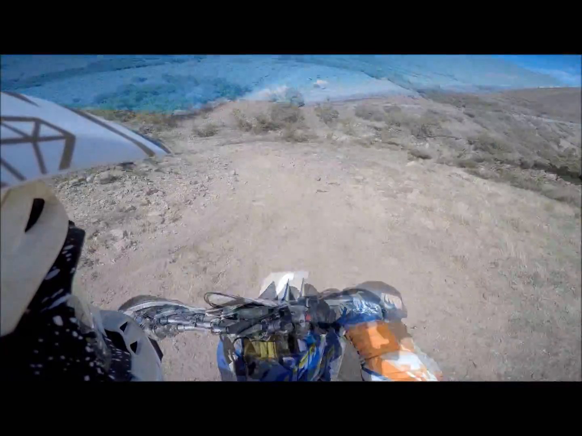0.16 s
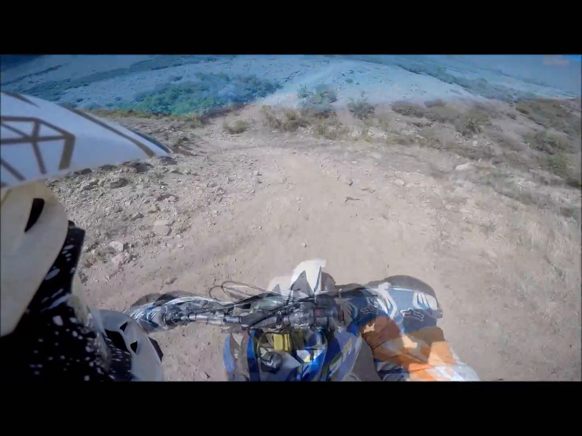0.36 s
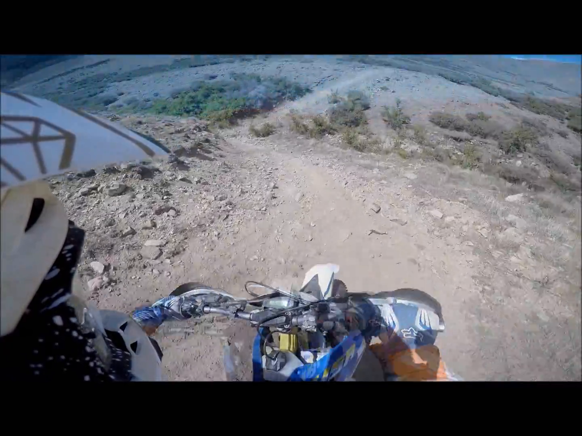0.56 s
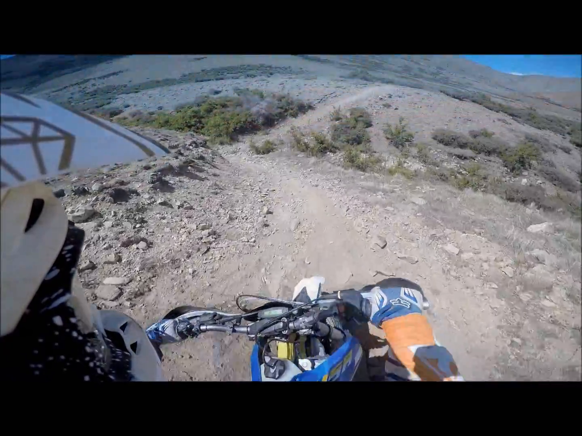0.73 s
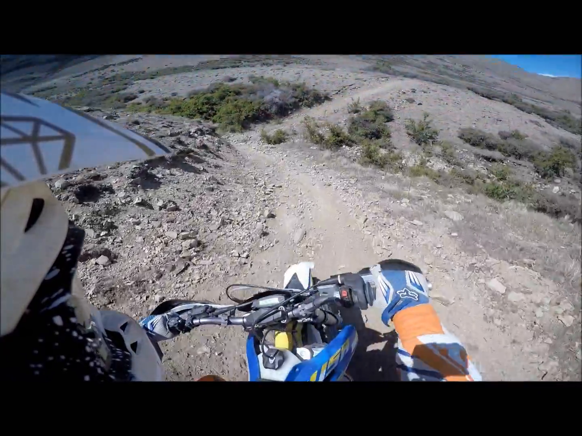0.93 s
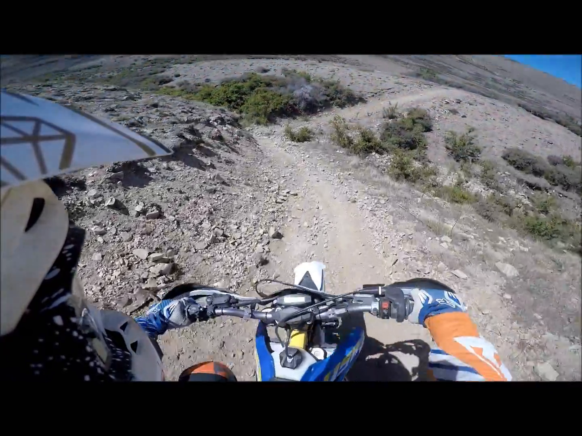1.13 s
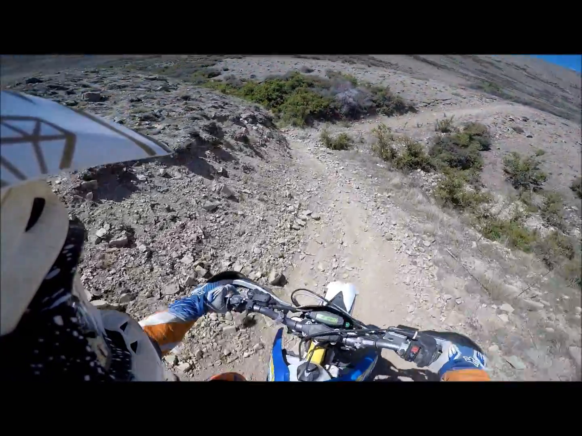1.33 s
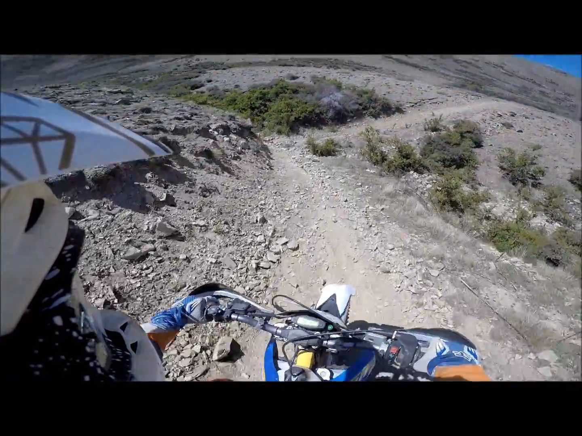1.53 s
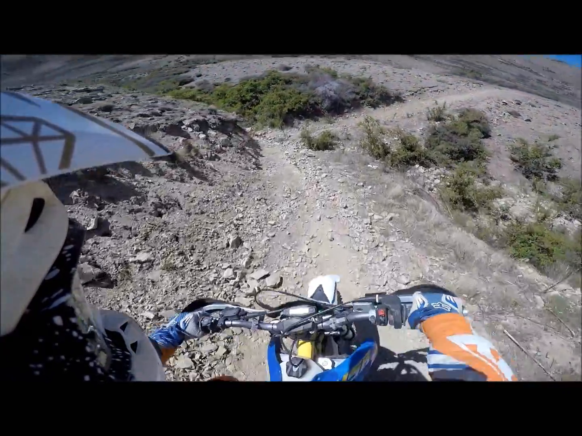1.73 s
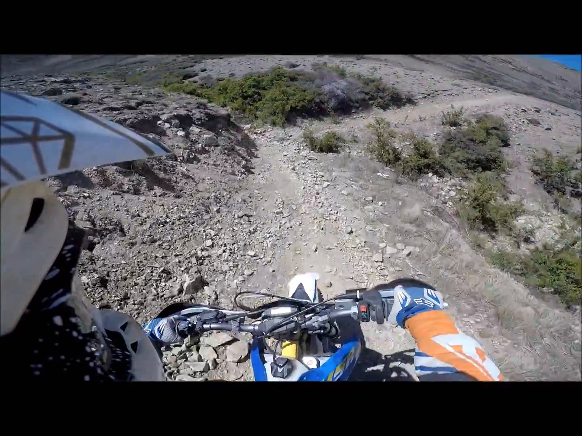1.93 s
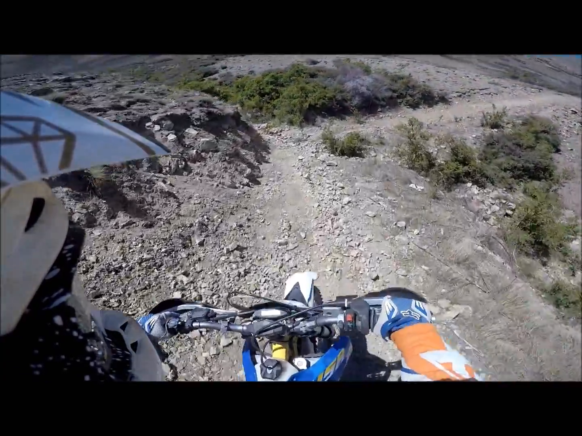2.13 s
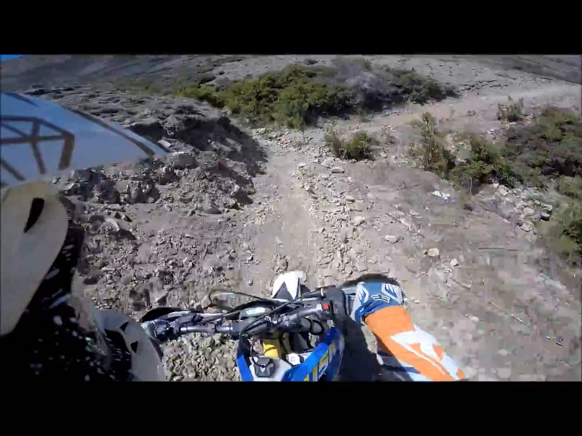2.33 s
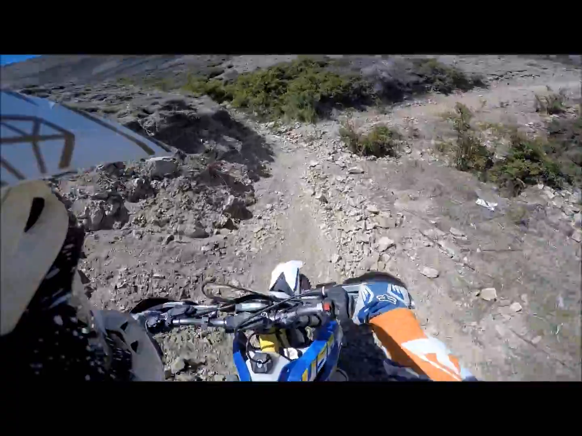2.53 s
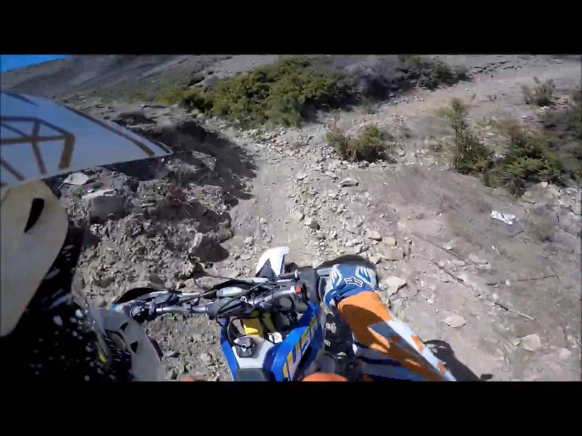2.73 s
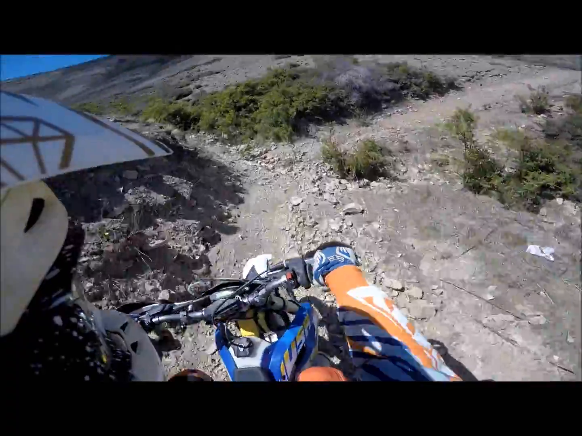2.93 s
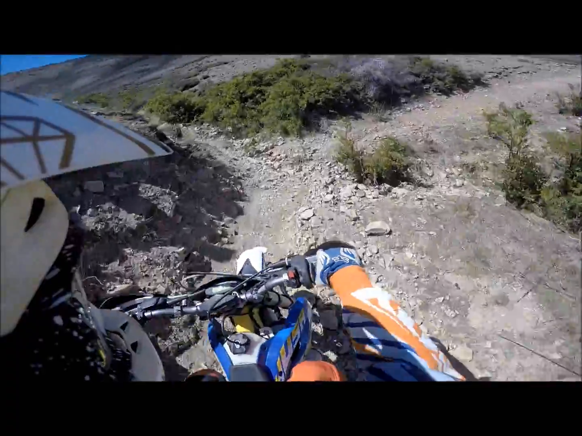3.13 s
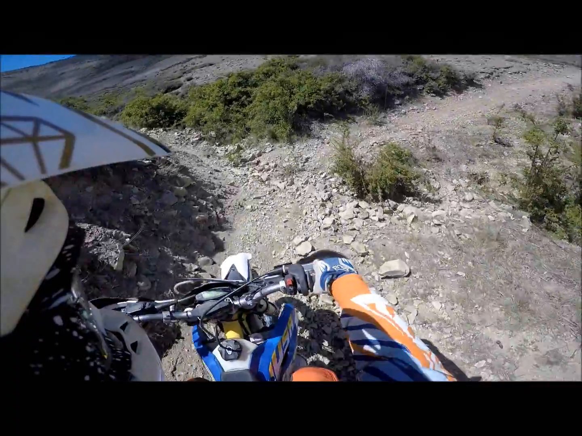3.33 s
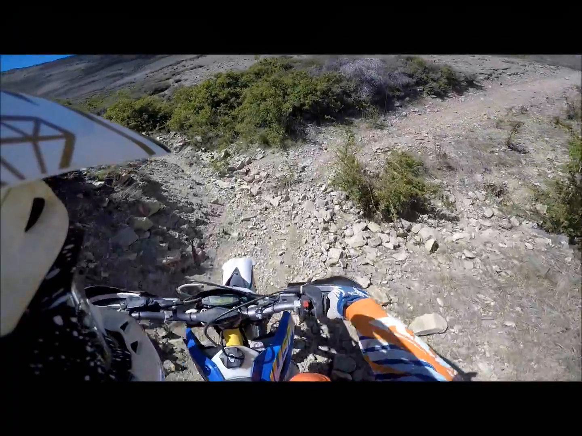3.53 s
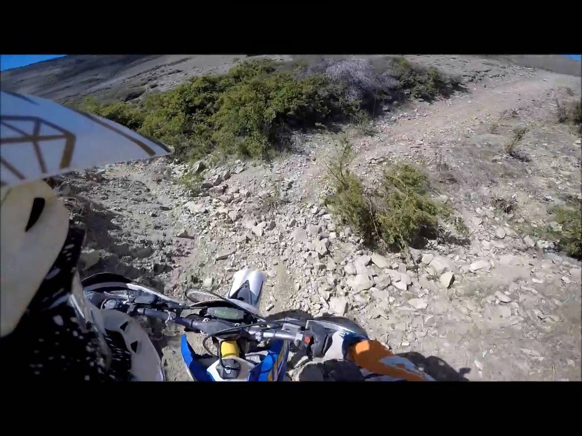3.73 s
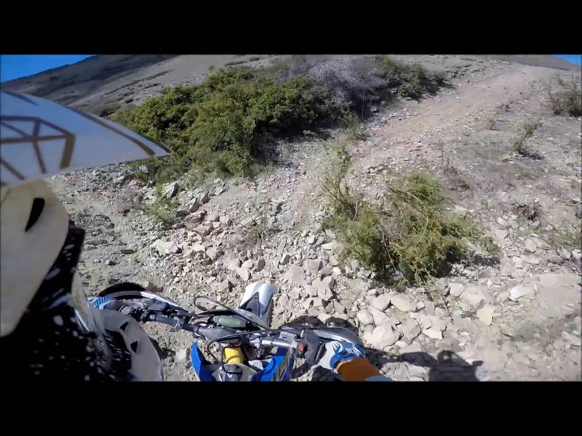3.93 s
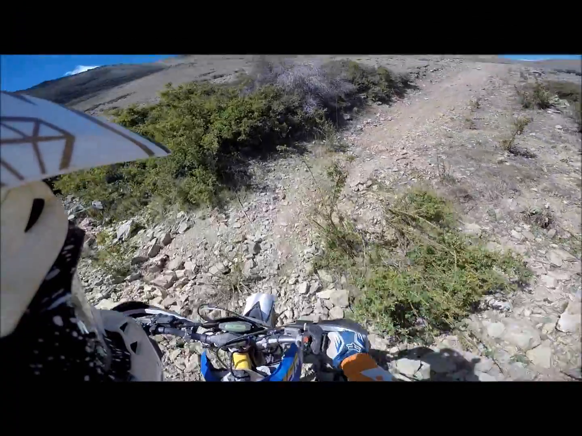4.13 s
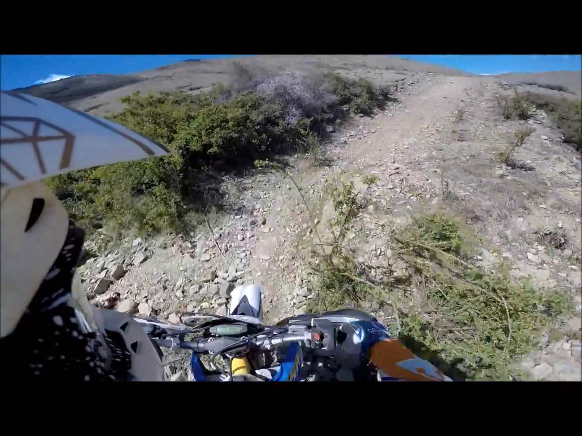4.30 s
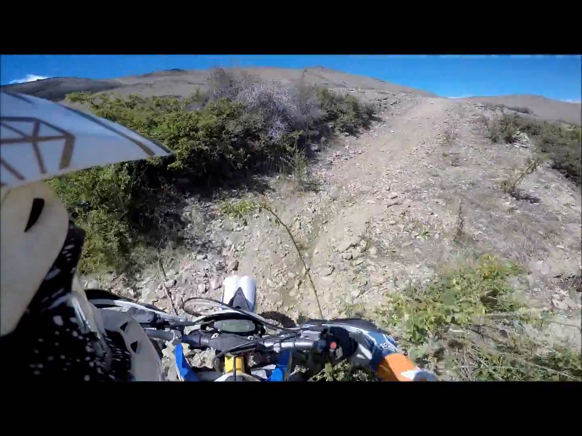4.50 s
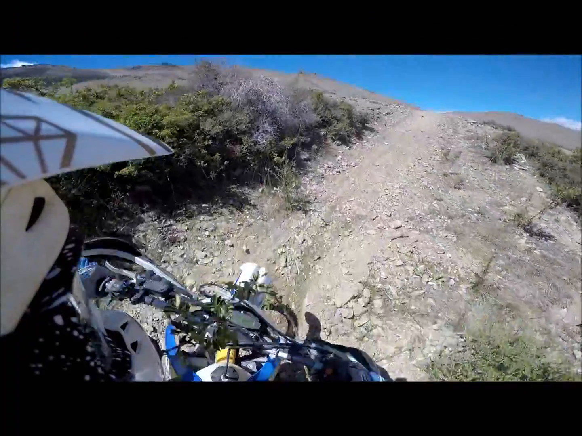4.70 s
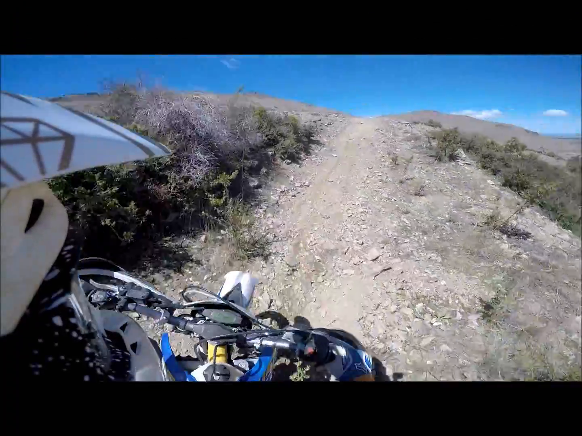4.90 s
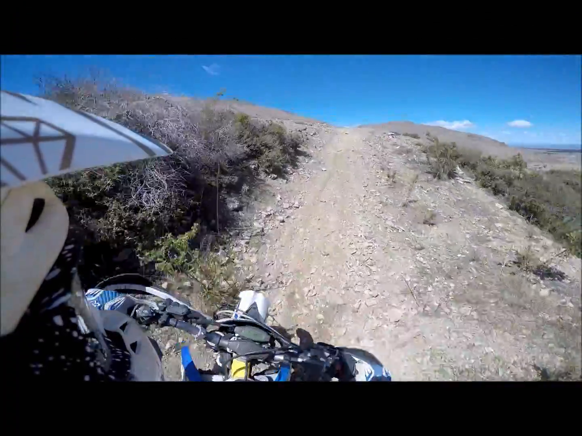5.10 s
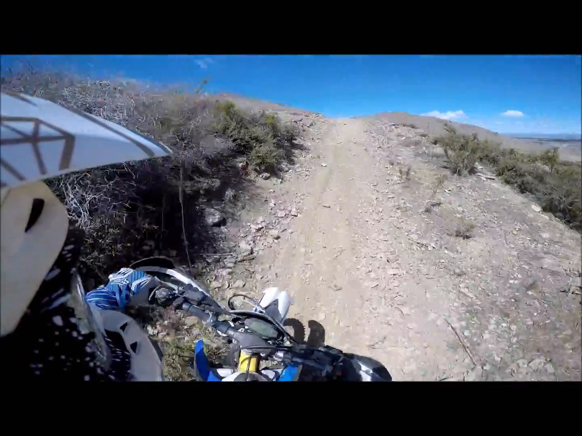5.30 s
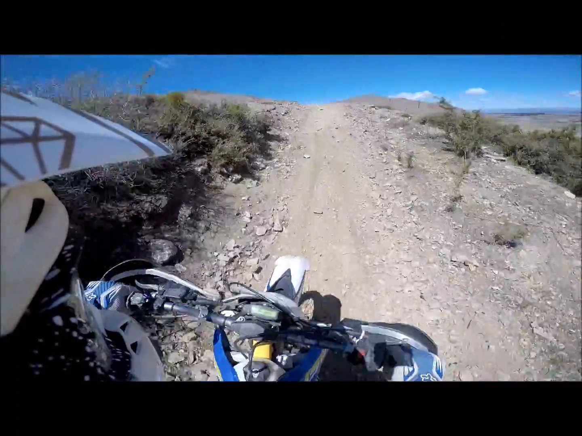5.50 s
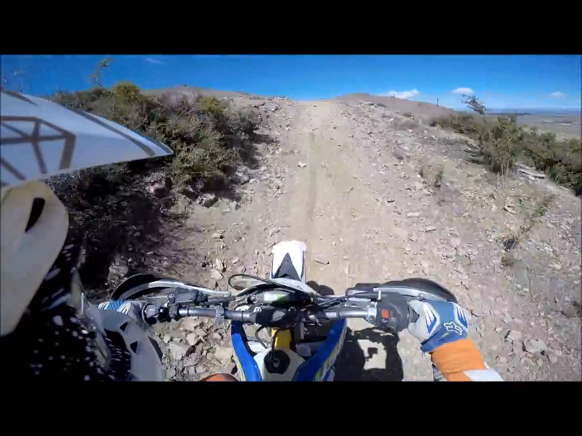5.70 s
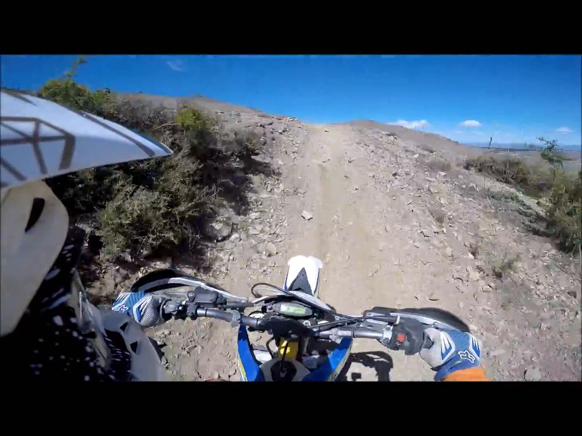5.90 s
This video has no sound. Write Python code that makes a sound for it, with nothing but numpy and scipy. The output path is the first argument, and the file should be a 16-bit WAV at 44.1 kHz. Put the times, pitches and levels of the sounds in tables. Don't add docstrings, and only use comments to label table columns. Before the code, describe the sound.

A single-cylinder two-stroke dirt bike is heard from the rider's helmet in open air, through a sealed case that makes it boomy and dull, with low wind buffeting strongest early on. From 0 to 0.2 s it holds a buzzing note near 67 Hz, then breaks into crowded, rough barks and knocks, thickest and loudest from 0.5 to 1.1 s. From about 1.2 to 4 s it coasts: hollow, uneven pops a few times a second, weak stutters between, breathy hisses of exhaust gas, light metal clatter, gritty ticks and stone cracks. At 4.05 s a hard blip rises and drops away by 4.35 s. Around 4.65 s stones clank with a brief metallic ping as the engine lugs and picks up, falters near 4.85 to 4.95 s, then pulls again. From 5.07 s to the end, a steady, hard, raspy exhaust drone holds around 60 to 67 Hz, with a buzzing intake.

```python
import sys
import numpy as np
from scipy import signal
from scipy.fft import rfft, irfft, next_fast_len
from scipy.io import wavfile
from scipy.ndimage import map_coordinates

SR = 44100
rng = np.random.default_rng(int(sys.argv[2]) if len(sys.argv) > 2 else 0)


def gain_from_db(level_db):
    decades = np.asarray(level_db, float) / 20
    return 10 ** decades


def pcm_store(signal):
    levels = np.round(np.clip(np.atleast_2d(signal), -1, 1) * 32767)
    wavfile.write(sys.argv[1], SR, levels.astype(np.int16).T)


N = 262395


def unit(x):
    return x / np.sqrt(np.mean(x ** 2) + 1e-20)


def along(points, hz):
    f, v = np.transpose(points)
    return np.interp(np.log(hz + 1), np.log(f + 1), v)


def curves(rows):
    s, *cols = np.transpose(rows)
    return [np.interp(np.arange(N) / SR, s, c) for c in cols]


def wobble(rate, size=N):
    knots = rng.standard_normal(int(size * rate / SR) + 4)
    return map_coordinates(knots, [np.arange(size) * rate / SR])


def filtered(x, response):
    m = next_fast_len(N + SR // 2)
    return irfft(rfft(x, m) * response(np.fft.rfftfreq(m, 1 / SR)), m)[:N]


def noise(spectrum):
    return unit(filtered(rng.standard_normal(N), lambda hz: gain_from_db(along(spectrum, hz))))


def modes(table):
    def response(f):
        total = 0
        for k, (centre, width, db) in enumerate(table):
            damping = 1j * f * width
            total = total + (-1) ** k * gain_from_db(db) * damping / (centre * centre - f * f + damping)
        return total
    return response


def placed(starts, rows):
    at = np.round(np.asarray(starts) * SR).astype(int)[:, None] + np.arange(rows.shape[1])
    return np.bincount(at.ravel(), rows.ravel(), N + SR)[:N]


def bursts(s, db, life, hold):
    t, life = np.arange(SR // 8) / SR, np.clip(life, .004, .2)[:, None]
    decay = gain_from_db(db[:, None] - 60 * (t / life) ** hold)
    return placed(s - .001, decay * (1 - np.exp(-t / (0.023 * life))))


def turn_beat(strokes):
    t = np.arange(SR // 20) / SR
    return signal.fftconvolve(strokes, t / 0.0069 * np.exp(1 - t / 0.0046))[:N]


# time in seconds, wind level in
# dB, clatter level in dB.
RIDE = [(0.08, -19, -38), (0.36, -19.5, -39), (0.75, -18, -35), (0.91, -15.5, -32.5), (1.0, -21.5, -40.5),
        (1.36, -31, -45.5), (1.55, -21.5, -40.5), (2.09, -21.5, -37.5), (2.67, -27, -39.5),
        (3.3, -23, -37.5), (3.68, -27.5, -40.5), (4.03, -23, -39), (4.2, -27.5, -44), (4.48, -30, -46.5),
        (4.66, -35, -37.5), (4.83, -33, -49), (5.03, -35, -43), (5.7, -36, -39.5)]
# frequency in Hz, density in dB per Hz.
BUFFET = [(11, -34), (18, 5), (75, 3), (113, -8), (146, -2.5), (200, -24.5), (260, -36), (440, -120)]


def wind():
    buffet_db = curves(RIDE)[0]
    return gain_from_db(buffet_db + 2.0 + 0.35 * wobble(18.0) + 0.28 * wobble(18)) * noise(BUFFET)


# frequency in Hz, level in dB.
WHINE = [(12618, -79)]


def whine():
    (hz, db), = WHINE
    phase = 2 * np.pi * np.cumsum(hz + 7 * wobble(20)) / SR
    return gain_from_db(db + 1.5 + 2.5 * wobble(10)) * np.sin(phase)


# frequency in Hz, density in dB per Hz.
JET = [(2500, -120), (3500, -3.5), (5300, -1), (7500, -9), (11000, -14), (15200, -15), (15800, -28.5)]


def sand():
    loose_ground_s, grain_t60_s = 4, 0.0091
    luck = rng.random((56, 2))
    db = -39 - 4 * np.log(luck[:, 1] + .12)
    starts = 0.014 + loose_ground_s * luck[:, 0]
    return bursts(starts, db, np.full(len(db), grain_t60_s), 0.89) * noise(JET)


# start in seconds, level in dB, t60 in seconds.
STONES = [(0.322, -31, 0.061), (0.338, -22, 0.07), (0.358, -27, 0.07), (.607, -28, 0.076),
          (1.04, -29.5, 0.083), (1.088, -27.5, 0.068), (1.286, -29.5, 0.054), (1.323, -24, 0.063),
          (1.466, -25.5, 0.054), (1.653, -25.5, 0.047), (1.947, -30.5, 0.053), (2.135, -21, 0.084),
          (2.155, -33, 0.055), (2.6, -25.5, 0.076), (2.717, -28.5, 0.046), (3.078, -26.5, 0.057),
          (3.251, -34, .06), (4.11, -32, .04), (4.644, -24, 0.02), (4.649, -19, 0.03), (4.697, -26, 0.034)]
# frequency in Hz, density in dB per Hz.
GRIT = [(700, -120), (1100, 0), (2500, 4.5), (4500, -2.5), (6500, -6), (8500, -26)]


def stones():
    return bursts(*np.transpose(STONES), 0.88) * noise(GRIT)


# start in seconds, frequency in Hz, level in dB, t60 in seconds.
PINGS = [
    (0.301, 2490, -23.5, 0.053),
    (3.386, 5210, -19, 0.022),
    (4.651, 1500, -21, 0.03),
    (4.651, 2300, -22, 0.025),
    (4.645, 5545, -14.5, 0.011),
]


def pings():
    s, hz, db, t60 = np.transpose(PINGS)[:, :, None]
    t = np.arange(SR // 10) / SR
    envelope = gain_from_db(db - 60 * t / t60) * (1 - np.exp(-t / 0.00077))
    return placed(s[:, 0], envelope * np.sin(2 * np.pi * hz * t))


# frequency in Hz, density in dB per Hz.
METAL = [(530, 2), (900, -0.5), (1160, -6), (1670, -5), (2120, -9), (2310, -5.5), (2700, -6.5), (3190, -10),
         (5070, -12.5), (6290, -15), (8170, -29), (13000, -35), (15300, -41.5), (15800, -51)]
# frequency in Hz, width in Hz, level in dB.
PANELS = [
    (2810, 150, 0),
    (5050, 350, -5),
]
# frequency in Hz, density in dB per Hz.
RASP = [(1100, -55.5), (1400, -6.5), (1750, -3), (2300, -14), (4500, -4.5), (8000, -12), (15200, -16.5),
        (15800, -27.5)]


def clatter(beat, throttle, blip):
    clatter_db = curves(RIDE)[1]
    rattle = gain_from_db(1.01 * wobble(22.95) + 1.3 * wobble(90)) * (1.57 + 0.32 * beat) * noise(METAL)
    ringing = unit(filtered(rng.standard_normal(N), lambda f: modes(PANELS)(f) ** 2))
    fins = gain_from_db(-6 - 8 * throttle) * (.45 + 1.0 * beat) * ringing
    opening = .55 * throttle + 1.4 * blip
    rasp = gain_from_db(-2 + 1.8 * wobble(6.5)) * opening * (0.45 + .7 * beat) * noise(RASP)
    return gain_from_db(clatter_db - 1.5) * (rattle + fins + rasp)


# time in seconds, effort in dB.
EFFORT = [(0.2, -25.5), (0.4, -20.5), (0.66, -18), (0.78, -15.5), (0.92, -18), (1.0, -20.5), (1.11, -14.5),
          (1.15, -27), (1.45, -27.5), (2.25, -17.5), (2.67, -23), (3.5, -24.5), (4.03, -25.5),
          (4.12, -17.5), (4.24, -15.5), (4.33, -35.5), (4.6, -16), (4.85, -23)]
# frequency in Hz, density in dB per Hz.
ROAR = [(71, -17), (120, -23), (182, 1), (232, -4), (355, -4.5), (435, -4.5), (529, -10), (591, -9),
        (781, -22), (1100, -45), (1430, -59), (2420, -120)]


def roar(beat, throttle):
    roar_db = (1 - throttle) * curves(EFFORT)[0] - 36 * throttle
    unsteady_db = np.clip(2.2 * wobble(30), -4, 2)
    return gain_from_db(roar_db + 2.5 + unsteady_db) * (0.42 + 0.55 * beat) * noise(ROAR)


# start in seconds, peak in dB.
PUFFS = [(0.112, -32.5), (0.2309, -52), (0.3227, -30), (0.354, -32), (0.524, -29.5), (0.618, -30.5),
         (0.6496, -31), (0.6748, -32), (0.7, -31.5), (0.744, -28.5), (0.9557, -25), (0.995, -44),
         (1.047, -37), (1.0927, -30), (1.115, -33), (1.18, -38.5), (1.648, -30), (2.066, -34.5),
         (2.44, -39), (4.146, -39), (4.1699, -48), (4.417, -38.5), (4.506, -32), (4.562, -31.5),
         (4.609, -35), (4.8274, -37), (4.896, -38), (4.9483, -38)]
# start in seconds, silencer ring in dB, chamber ring in dB, puff in dB.
POPS = [(1.451, -14.5, -29, -48), (1.569, -8.5, -11, -28.5), (1.85, -11, -34, -50), (1.935, -12, -33, -40),
        (2.03, -12.5, -38, -47), (2.214, -9, -19, -34.5), (2.367, -6.5, -33, -32),
        (2.531, -29, -9.5, -34.5), (2.636, -6, -12.5, -30), (2.84, -7, -15, -31.5), (2.984, -6.5, -13, -28),
        (3.17, -4.5, -15, -25.5), (3.391, -5, -10, -25.5), (3.591, -9, -26, -37.5),
        (3.682, -11, -14, -34.5), (3.857, -6, -10.5, -26)]
# frequency in Hz, density in dB per Hz.
DULL = [(900, -120), (1300, 4.5), (2500, 12), (4000, -0.5), (5000, -120)]


def puffs():
    pops = np.transpose(POPS)
    pop_puffs = [pops[0] - 0.003, pops[3]]
    s, db = np.hstack([np.transpose(PUFFS), pop_puffs])
    t60_s = 0.085 + 0.0028 * (db + 32)
    shape = bursts(s, db - 3.5, t60_s, 1.066)
    return shape * gain_from_db(2.7 * wobble(250)) * (noise(JET) + gain_from_db(-5.5) * noise(DULL))


# time in seconds, frequency in Hz, level in dB.
SURGE = [
    (4.109, 48.8, -12),
    (4.188, 80.6, -22.5),
    (4.244, 101, -29),
    (4.311, 117, -33),
]


def surge():
    hz, db = curves(SURGE)
    time = np.arange(N) / SR
    fade = np.clip(np.minimum(time - SURGE[0][0], SURGE[-1][0] - time) / 0.05, 0, 1)
    return fade * gain_from_db(db + 5.5) * np.sin(2 * np.pi * np.cumsum(hz) / SR), fade


# time in seconds, level in dB.
VALVE = [(0.2, 0), (4.7, -5), (5.0, -4), (5.45, -2), (5.56, 4.5), (5.67, 3.5), (5.73, -1), (5.85, 3)]
# frequency in Hz, width in Hz, level in dB.
REED = [(1280, 200, -2), (1640, 260, -0.5), (1900, 240, -1.5), (2380, 380, -1), (2850, 300, -2.5)]


def reed_valve(steady):
    valve_db = curves(VALVE)[0]
    t = np.arange(SR // 30) / SR
    flutter = rng.standard_normal(len(t)) * gain_from_db(-60 * t / .016)
    flutter = flutter / np.linalg.norm(flutter)
    snaps = signal.fftconvolve(gain_from_db(valve_db + .9 * wobble(60)) * steady, flutter)[:N]
    return filtered(snaps, lambda f: modes(REED)(f) ** 2)


# start in seconds, peak in dB, pitch in Hz.
KNOCKS = [(0.236, -19, 522), (0.356, -10.5, 612), (0.482, -26, 550), (0.514, -25, 516), (0.534, -11, 581),
          (0.578, -11, 590), (0.65, -9, 516), (0.75, -11.5, 510), (0.858, -20, 526), (0.897, -19, 525),
          (0.964, -19, 566), (1.049, -17, 635), (1.161, -18.5, 522), (1.183, -15, 510), (1.571, -13, 514),
          (1.685, -20, 580), (1.812, -22, 525), (1.859, -19, 522), (1.894, -20, 522), (1.992, -21, 566),
          (2.119, -10.5, 610), (2.186, -11.5, 546), (2.278, -19, 596), (2.323, -16.5, 554),
          (2.369, -16, 564), (2.414, -21, 596), (2.486, -22, 523), (2.535, -19, 565), (2.59, -21, 568),
          (2.634, -12, 549), (2.791, -29, 554), (3.154, -20, 570), (3.17, -14, 570), (3.39, -13, 525),
          (3.599, -13, 522), (3.689, -17, 552), (3.732, -18, 581), (3.858, -15, 530), (4.022, -22, 546),
          (4.066, -5.5, 504), (4.109, -6, 533), (4.163, -12, 522), (4.189, -21, 510), (4.39, -22, 540),
          (4.456, -31, 596), (4.474, -27, 517), (4.54, -18, 543), (4.566, -16, 589), (4.612, -13, 565),
          (4.658, -6, 522), (4.796, -25, 638), (4.831, -15, 522), (4.875, -31, 523), (4.994, -14, 670)]


def knocks():
    t60_s, rise_s = 0.045, 0.0014
    s, db, hz = np.transpose(KNOCKS)[:, :, None]
    t, luck = np.arange(SR // 16) / SR, rng.random((len(KNOCKS), 2))
    ring = np.sin(2 * np.pi * (hz * t + luck[:, :1]))
    ring += 0.28 * np.sin(2 * np.pi * (1.22 * hz * t + luck[:, 1:]))
    envelope = gain_from_db(db + 1 - 60 * t / t60_s) * (1 - np.exp(-t / rise_s))
    return placed(s[:, 0] - 0.001, envelope * ring)


# start in seconds,
# chamber ring in dB, silencer ring in dB, thump in dB.
KICKS = [(0.24, -11, -16, -9), (0.415, -10, -25, -15), (0.605, -3.5, -11, -11), (0.794, -16, -15, -1.5),
         (0.818, -16, -13.5, -4), (0.85, -24, -13, -7), (0.872, -12, -26, -7), (0.93, -6, -31, -4),
         (4.091, -7.5, -15, -16), (4.13, -18, -28, -22), (4.231, -3, -13.5, -15), (4.275, -13.5, -19, -18),
         (4.361, -20, -22, -37), (4.389, -14.5, -20, -24), (4.414, -20, -22, -15), (4.451, -16, -32, -20),
         (4.502, -5, -22, -18), (4.585, -6, -12, -11), (4.632, -1.5, -22, -25), (4.921, -4.5, -14, -20),
         (0.299, -6, -29, -18), (0.332, -6.5, -22, -20), (0.35, -13.5, -12.5, -21), (0.367, -7.5, -8, -7),
         (0.472, -2.5, -31, -17), (0.532, -0.5, -6.5, -8.5), (0.577, 4, -29, -7), (0.645, -5.5, -5.5, -0.5),
         (0.667, 0.5, -15, -13), (0.697, 1.5, -4, -9), (0.744, -7, -6.5, -3.5), (0.959, 3, -5.5, 1.5),
         (0.99, 5, -11, -12), (1.021, 2, -26, -14), (1.049, -1, -12.5, -17), (1.07, -1, -10, -11),
         (1.094, -0.5, -9, -15.5), (1.114, -6, -20, -20), (4.061, -4, -10, -14), (4.105, 5, -3, -33),
         (4.157, -10, -7.5, -21.5), (4.194, -1.5, -2.5, -9), (4.214, -0.5, -1, -23), (4.256, -28, -18, -19),
         (4.475, -7.5, -12, -36), (4.537, -4, -12, -11), (4.559, -3.5, -20, -34), (4.611, 4.5, -5, -27),
         (4.828, -6, -22, -17), (4.895, -5, -23, -12), (4.966, -5, -13, -22),
         (0.488, -12, -23, -11), (0.519, -18, -9, -20), (0.557, -9, -21, -22), (0.621, -12, -9, -3),
          (0.684, -11, -11.5, -6), (0.978, -4.5, -13.5, -20), (1.007, -9, -11, -20), (1.036, -10, -7, -20),
          (4.145, -15, -8.5, -12), (4.175, -18.5, -18.5, -17), (4.185, -6, -8.5, -22),
          (4.204, -10, -8, -20)]
# start in seconds, silencer ring in dB, chamber ring in dB.
STUTTERS = [(1.16, -18, -35), (1.345, -17.5, -28), (1.417, -25, -38), (1.495, -21.5, -25.5),
            (1.533, -22, -26), (1.65, -15.5, -21), (1.685, -21, -22.5), (1.811, -17.5, -33),
            (1.9, -21, -31), (1.993, -12, -24), (2.082, -17.5, -25), (2.148, -18, -21), (2.185, -17, -23),
            (2.274, -21, -26), (2.31, -16, -14), (2.412, -17, -24), (2.469, -30, -19.5), (2.59, -19, -16),
            (2.688, -19, -20), (2.752, -32, -17.5), (2.793, -16.5, -17), (2.907, -26, -23),
            (2.944, -18, -18.5), (3.035, -15, -20), (3.079, -20, -18), (3.124, -26, -17),
            (3.219, -17, -21.5), (3.256, -19, -34), (3.315, -17, -19), (3.35, -19, -19.5),
            (3.434, -17, -20), (3.486, -26, -42), (3.563, -20, -29), (3.64, -15.5, -19), (3.73, -15.5, -18),
            (3.772, -23, -20), (3.829, -18, -18), (3.899, -21, -19), (4.001, -25, -44)]
# time in seconds, speed in turns per second.
SPEED = [(0, 24), (.6, 30), (1.0, 40), (1.2, 25), (1.5, 21.5), (3.9, 21.5), (4.1, 42), (4.3, 30), (5, 36)]
# level at idle effort in dB, dB gained per dB of effort, scatter in dB.
WEAK = [
    (-24, 1, -3),
    (-23, 0.6, 8.5),
    (-16, 0, -6.5),
]


def fired(throttle):
    s, silencer, chamber, _ = np.transpose(POPS)
    pops = np.transpose([s, chamber, silencer, silencer])
    s, silencer, chamber = np.transpose(STUTTERS)
    ignition = s - 0.00408
    stutters = np.transpose([ignition, chamber, silencer, chamber]) + (0, 4.5, 0.5, 4)
    strong = np.vstack([KICKS, pops, stutters])
    edges = np.sort(np.append(strong[:, 0], .2))
    gaps = np.diff(edges)
    speed = np.transpose(SPEED)
    counts = np.round(gaps * np.interp(edges[:-1] + gaps / 2, *speed)).astype(int)
    s = np.hstack([np.linspace(a, b, n + 1)[1:-1] for a, b, n in zip(edges, edges[1:], counts)])
    luck = rng.standard_normal((len(s), 4))
    s = s + 0.0876 * luck[:, 3] / np.interp(s, *speed)
    base, grows, scatter = np.transpose(WEAK)
    effort = np.interp(s, *np.transpose(EFFORT))[:, None] + 24
    weak = base + grows * effort + scatter * np.clip(luck[:, :3], -2, .9)
    weak = weak - 60 * throttle[(s * SR).astype(int), None]
    return np.vstack([strong, np.column_stack([s, weak])])


def echoed(hz, share):
    round_trip_s = 0.0111
    return 1 / (1 - np.clip(share, 0, .8) * np.exp(-2j * np.pi * hz * round_trip_s))


# frequency in Hz, swell time in seconds, pitch scatter as a share,
# sharpness (no unit), phase at the crest in rad.
RINGS = [
    (248, 0.0065, 0.04, 1.9, 1.54),
    (445, 0.0075, 0.035, 1.3, 0.07),
    (98, 0.0075, 0.14, 2.4, 2.65),
]


def firings(rows):
    s, *levels = np.transpose(rows)
    t, out = np.arange(SR // 16) / SR, np.zeros(N)
    for (hz, swell, scatter, sharp, start), db in zip(RINGS, levels):
        luck = rng.standard_normal((len(s), 2))
        shape = (t / swell * np.exp(1 - t / swell)) ** sharp
        pitch = hz * (1 + scatter * luck[:, :1])
        phase = 2 * np.pi * pitch * (t - swell) + start + 0.5 * luck[:, 1:]
        out += placed(s + 0.002, gain_from_db(db - 3.5)[:, None] * shape * np.cos(phase))
    crack_hz = 630 * (1 + 0.18 * rng.standard_normal((len(s), 1)))
    crack = gain_from_db(-60 * t / 0.029) * np.sin(2 * np.pi * crack_hz * t)
    crack_db = np.maximum(levels[0], levels[1]) - 11.5
    crack = placed(s + 0.00456, gain_from_db(crack_db)[:, None] * crack)
    crack = filtered(crack, lambda f: 1 / (1 + 1j * f / 800) ** 4)
    return filtered(out + crack, lambda f: echoed(f, 0.03))


RETURNS = [
    [(-.68, .475), (-.835, .884), (.92, .077)],
    [(-.73, .79), (-.45, .466), (1.01, .413)],
]
RETURN_RAD = [3.77, 3.89]


def returns(k, song):
    sums = []
    for rows, rad in zip(RETURNS, RETURN_RAD):
        reflected = sum(share * np.exp(-2j * np.pi * k * delay) for share, delay in rows)
        sums.append(np.exp(1j * rad) * (1 + reflected))
    off, on = sums
    return np.angle(off) + song * np.angle(on / off)


# time in seconds, share on song from 0 to 1.
ON_SONG = [(.3, 1), (4.5, 0), (5.2, 0), (5.31, 1)]


def pull(rows, orders, home_hz, rough_db, turns):
    time = np.arange(N) / SR
    running = np.clip(np.minimum(time - rows[0][0], rows[-1][0] - time) / 0.077 + .5, 0, 1)
    on = running > 0
    turns_hz, level_db = (curve[on] for curve in curves(rows))
    rough_db = rough_db * (1 + 12 * np.clip(1 - turns_hz / home_hz, 0, 1))
    note, song = np.zeros(on.sum()), curves(ON_SONG)[0][on]
    for k in range(1, 18):
        db = np.interp(k * (turns_hz / home_hz) ** .8, *np.transpose(orders), right=-50)
        swing = rough_db * wobble(30, size=len(note))
        slip = 0.12 * rough_db * wobble(30, size=len(note))
        note += gain_from_db(db + swing) * np.cos(2 * np.pi * k * turns[on] + returns(k, song) + slip)
    out = np.zeros(N)
    out[on] = gain_from_db(level_db) * unit(note)
    return running * out, running


# time in seconds, speed in turns per second, level in dB.
PULLS = [
    [(-0.05, 68.3, -13), (0.024, 67.8, -9), (0.058, 66.75, -11), (0.108, 72.1, -9.5), (0.186, 66.6, -12),
     (0.24, 67.8, -29)],
    [(4.63, 50.33, -16), (4.66, 51.85, -9), (4.69, 55.1, -11.5)],
    [(4.69, 53.8, -7), (4.718, 58.2, -7), (4.764, 60.5, -9.5), (4.83, 59.6, -22.5)],
    [(4.925, 44.26, -15), (4.96, 47.06, -13), (4.995, 49.2, -12.5), (5.03, 54.1, -9), (5.065, 58.3, -20.5)],
    [(5.065, 58.6, -3.5), (5.098, 60.4, -9), (5.274, 62.1, -10.5), (5.34, 61.5, -10.5), (5.37, 64, -12.5)],
    [(5.37, 64.2, -7.5), (5.404, 67.53, -9.5), (5.466, 65.35, -10.5), (5.524, 66.8, -10.5),
     (5.584, 63.9, -11.5), (5.638, 63.56, -11), (5.72, 61.8, -10.5), (5.86, 65, -11), (5.904, 65.8, -10.5),
     (6.0, 64, -10)],
]
# multiple of the turn rate, level in dB.
CRUISE = [(1, -14), (2, -3.5), (3, 3), (4, 7), (5, -7.5), (6, 3), (7, 3.5), (8, -13.5), (9, -5.5),
          (10, -21), (11, -17), (12, -27), (13, -25), (14, -34)]
LUG = [(1, -9.5), (2, -2.5), (3, -24), (4, 1.5), (5, -2), (6, 0.5), (7, -2.5), (8, -14), (9, 2.5),
       (10, -2.5), (11, -16), (12, -9), (13, -8.5), (14, -20), (15, -18), (16, -25)]
CLIMB = [(1, -27), (2, -11), (3, -11.5), (4, 2), (5, -10.5), (6, -19), (7, -0.5), (8, -8), (9, -16),
         (10, -21), (11, -16), (12, -31), (13, -41.5), (14, -32), (15, -47), (16, -45)]
SPIN = [(1, -19), (2, -7.5), (3, -2), (4, 3), (5, -5), (6, -9), (7, -5.5), (8, -4.5), (9, -16.5),
        (10, -12.5), (11, -14), (12, -34), (13, -20.5), (14, -34), (15, -51), (16, -51.5)]


def pulls():
    turns_hz = curves([row for rows in PULLS for row in rows])[0]
    turns = np.cumsum(turns_hz * (1 + .004 * wobble(30))) / SR
    # colour, its turns Hz, roughness dB
    loads = [(CRUISE, 67.5, 2.4), (LUG, 50.5, 1.5), (CLIMB, 61, 1.3),
             (LUG, 50.5, 1.2), (CLIMB, 61, 1), (SPIN, 64.5, 1.4)]
    notes, openings = zip(*[pull(rows, *load, turns) for rows, load in zip(PULLS, loads)])
    return sum(notes), np.clip(sum(openings), 0, 1), turns


def scene():
    note, throttle, turns = pulls()
    shots = fired(throttle)
    lone = placed(shots[:, 0] - .008, np.ones((len(shots), 1)))
    steady = throttle * np.diff(np.floor(turns), prepend=0)
    beat = turn_beat(lone + steady)
    hum, blip = surge()
    background = wind() + whine() + sand() + stones() + pings()
    machine = clatter(beat, throttle, blip) + roar(beat, throttle) + puffs() + hum
    engine = reed_valve(steady) + knocks() + firings(shots) + note
    return (background + machine + engine)[None]


def roll_off(x):
    return signal.sosfilt(signal.butter(12, 15800, fs=SR, output="sos"), x)


def record(dry):
    clipped = dry / (1 + np.abs(dry / .99) ** 30) ** (1 / 30)
    limited = filtered(clipped[0], lambda hz: hz < 15800)[None]
    limited = limited * np.clip((N - np.arange(N)) / (.004 * SR), 0, 1)
    return roll_off(limited)


dry = scene()
out = record(dry)
pcm_store(out)
```